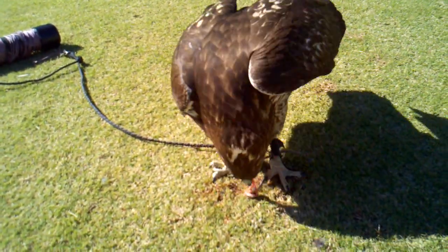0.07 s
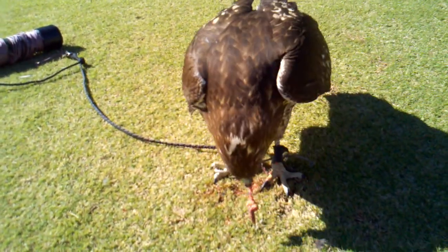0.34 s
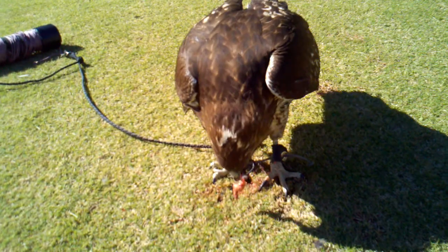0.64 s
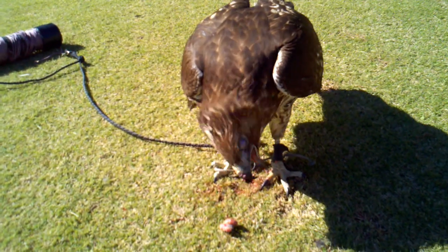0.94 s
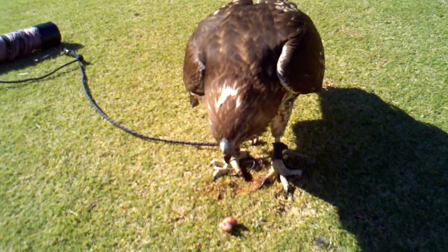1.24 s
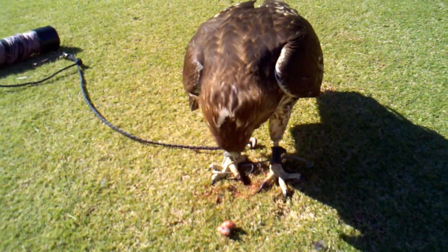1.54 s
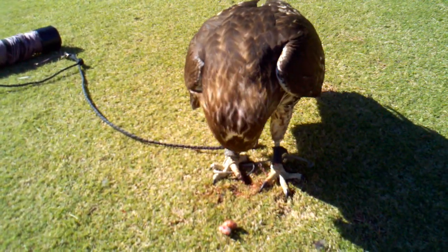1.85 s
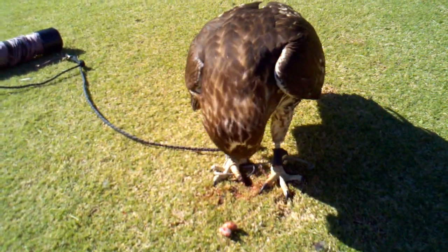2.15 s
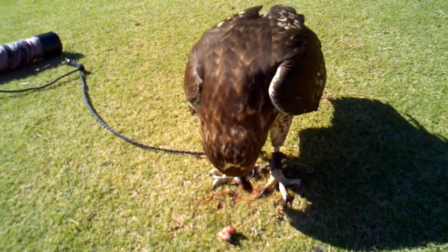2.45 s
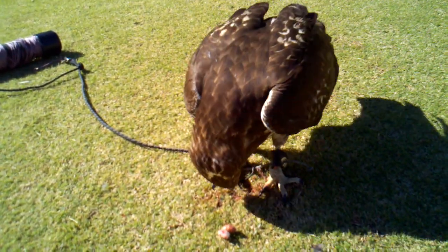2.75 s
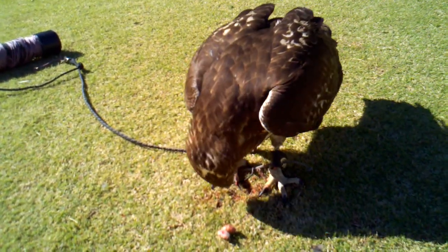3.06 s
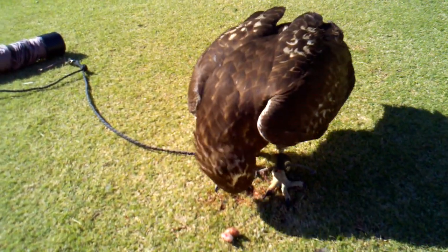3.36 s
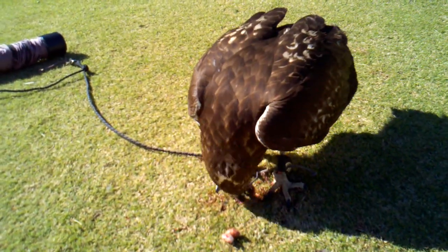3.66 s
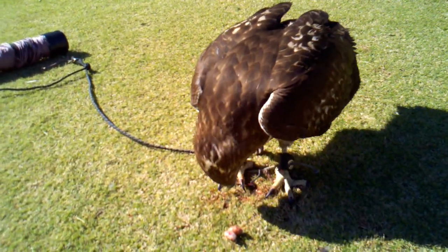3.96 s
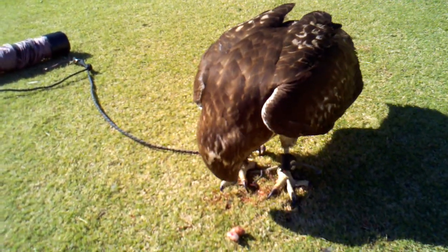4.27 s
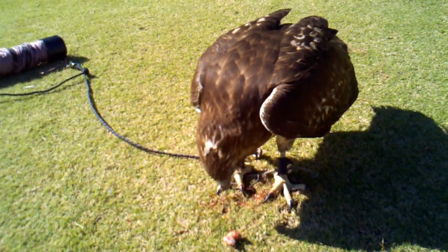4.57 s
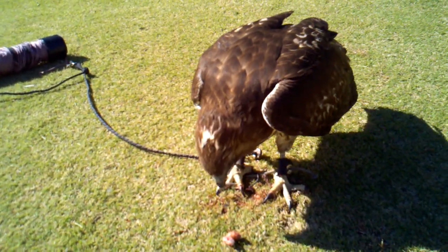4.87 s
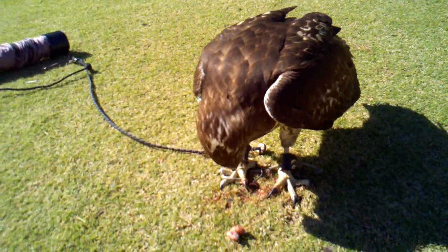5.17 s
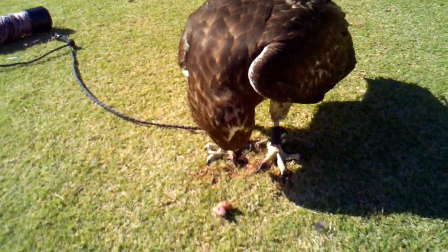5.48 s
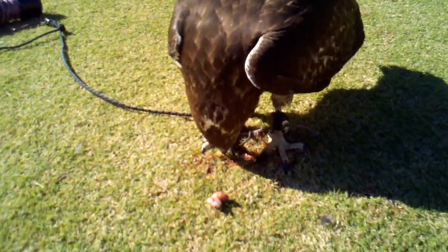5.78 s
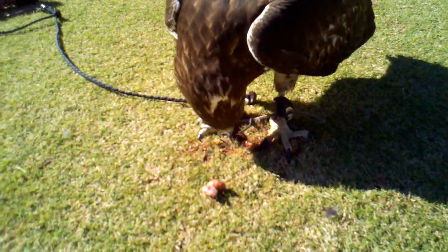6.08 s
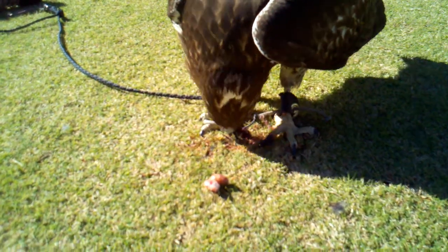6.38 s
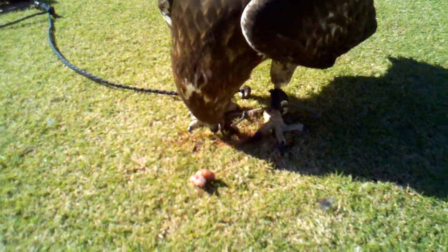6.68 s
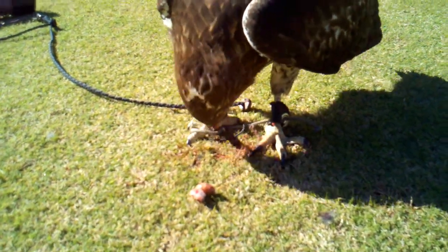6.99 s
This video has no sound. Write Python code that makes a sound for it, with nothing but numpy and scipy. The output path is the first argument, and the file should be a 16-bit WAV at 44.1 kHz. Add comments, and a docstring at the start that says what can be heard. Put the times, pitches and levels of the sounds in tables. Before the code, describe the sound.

Outdoors on a lawn, a distant engine like a mower drones throughout, over a low rumble and a fainter second motor hum. Just after 1 second its airy rush drops and its pitch rises slightly; the drone then slowly grows, wavering now and then. Light wind puffs on the microphone, mostly between 1 and 3 seconds and again from about 6.5. A hawk feeds close by, very faintly: soft beak snips near 0.9, 4 and 5.9 seconds, brief rustles and scattered tiny snaps of dry grass. From about 6.4 seconds a finger ticks and slides on the small camera's case. At about 6.8 it knocks the microphone with one sharp, overloaded pop, by far the loudest sound. The background ducks at once, and two short handling bumps follow around 7 seconds.

```python
"""A sunny lawn, heard through the two closely spaced ports of a small camera. Far away an engine,
perhaps a mower, drones and picks up speed, while light wind puffs at the ports. A tethered hawk
feeds with faint snips of the beak, rustles and snaps of dry grass; a second motor hums behind it.
Near the end a finger ticks and slides on the case, ringing the shell, and knocks one port, which
overloads and makes the gain control duck."""
import sys
import numpy as np
from scipy import signal
from scipy.fft import rfft, irfft, next_fast_len
from scipy.io import wavfile
from scipy.ndimage import uniform_filter1d

SR = 44100
rng = np.random.default_rng(int(sys.argv[2]) if len(sys.argv) > 2 else 0)


def wav_record(signal):
    """Record a signal, one row per channel, as 16-bit PCM in the file named by sys.argv[1]."""
    frames = np.transpose(np.atleast_2d(signal))
    bounded = np.clip(frames, -1, 1)
    # unit amplitude maps onto the largest positive 16-bit level
    quanta = np.round(bounded * 32767).astype(np.int16)
    wavfile.write(sys.argv[1], SR, quanta)


N = 314433

# How alike outdoor sound is at the two ports. Each row: frequency in Hz, correlation from -1 to 1.
LIKENESS = [(200, 1), (500, 0.66), (1000, -0.087), (1700, -0.51), (2500, 0.49), (4000, -0.14)]


def from_db(db):
    """Decibels to gain."""
    return 10 ** (np.asarray(db) / 20)


def rms_one(x):
    """Scale to rms 1."""
    return x / np.sqrt(np.mean(x ** 2) + 1e-20)


def seconds():
    """Time of every sample."""
    return np.arange(N) / SR


def crossing(middle_s, length_s):
    """A smooth step from 0 to 1."""
    return .5 + .5 * np.tanh((seconds() - middle_s) / length_s)


def swell(middle_s, half_length_s):
    """A bell curve of height 1 around a moment."""
    return np.exp(-np.minimum(((seconds() - middle_s) / half_length_s) ** 2, 50))


def drift(rate_hz):
    """A smooth random wobble of about rms 1, drawn every 100 samples."""
    r = np.exp(-200 * np.pi * rate_hz / SR)
    slow = signal.lfilter([1], [1, -2 * r, r * r], rng.standard_normal(N // 100 + 2002))[2000:]
    return np.interp(np.arange(N) / 100, np.arange(len(slow)), rms_one(slow))


def at_bins(points):
    """A curve over log frequency, read at every FFT bin."""
    hz, value = np.transpose(points)
    return np.interp(np.log(np.fft.rfftfreq(next_fast_len(N), 1 / SR) + 1), np.log(hz), value)


def noise(colour, likeness):
    """Noise at the two ports, from rows of (Hz, density in dB) and their correlation."""
    size = next_fast_len(N)
    common, apart = rfft(rng.standard_normal((2, size)))
    ports = np.sqrt(1 + likeness) * common + np.sqrt(1 - likeness) * apart * [[1], [-1]]
    return irfft(ports * from_db(at_bins(colour)), size)[:, :N] * np.sqrt(SR) / 2


def grains(per_s, spread_db):
    """Random clicks of uneven size, at rms 1."""
    sizes = from_db(spread_db * np.minimum(rng.exponential(1, N), 4)) * rng.choice([-1, 1], N)
    return rms_one(sizes * (rng.random(N) < per_s / SR))


def ring(force, hz, t60):
    """One mode: a unit click sets off a decaying sine of height 1."""
    r, w = from_db(-60 / (t60 * SR)), 2 * np.pi * hz / SR
    return signal.lfilter([0, np.sin(w)], [1, -2 * r * np.cos(w), r * r], force + 1e-18)


def tone(cycles, db, skew):
    """A sine at an rms level, its phase skew radians apart at the two ports."""
    return np.sqrt(2) * from_db(db) * np.sin(2 * np.pi * cycles + skew * np.array([[-.5], [.5]]))


def crank_hz(idle_hz=202.4, working_hz=211.2, pickup_s=1.2, settle_s=0.88):
    """Crank rate as the engine settles from idle to working speed; the pitches are its sixth order's."""
    still_idle = np.exp(-np.maximum(seconds() - pickup_s, 0) / settle_s)
    return (working_hz + (idle_hz - working_hz) * still_idle) / 6


def engine(drone_db=-48, rise_db_per_s=0.77, waver_db=0.5, fade_db=2.5, wander=0.75):
    """Crank orders droning, led by the sixth; moving air fades them and shifts their stereo phase."""
    # Brief dips of the sixth order. Each row: centre in seconds, depth in dB, half length in seconds.
    dips = [(1.4, 9, 0.18), (2.196, 9.5, 0.24), (6.226, 4, 0.15), (7.05, 14.5, 0.35)]
    # Weaker orders, arriving by many paths. Each row: multiple of the crank rate, early and late
    # level in dB, early and late phase between the ports in radians.
    orders = [(4, -59, -54, 0.17, 1.4), (5, -109, -71, .6, 0.73), (7, -62.5, -58, 0.16, 0.28),
              (8, -57.5, -73.5, 0.1, 3.7), (10, -73.5, -68.5, 0.19, .7), (12, -72, -77.5, 0.3, 0.39),
              (16, -81, -75.5, 0.59, 0.6)]
    dip_db = sum(depth_db * swell(s, half_length) for s, depth_db, half_length in dips)
    lead_db = drone_db + rise_db_per_s * seconds() - dip_db + waver_db * drift(6)
    partials = [(6, lead_db, 0.45)]   # order, level, phase between the ports
    dulling = crossing(middle_s=4.1, length_s=0.56)   # from a brighter balance to a deeper one
    for order, early_db, late_db, early_skew, late_skew in orders:
        db = early_db + (late_db - early_db) * dulling + fade_db * drift(0.25)
        partials.append((order, db, early_skew + (late_skew - early_skew) * dulling))
    turns = np.cumsum(crank_hz()) / SR
    return sum(tone(order * turns, db, skew * (1 + wander * drift(0.63))) for order, db, skew in partials)


def rush_gain_db(start_db=3, drop_db=5, ebb_db_per_s=1.5):
    """Fader for the machine's rush and whine: a quick drop and a slow ebb."""
    return start_db - drop_db * crossing(middle_s=1.26, length_s=0.13) - ebb_db_per_s * seconds()


def rush(flutter_db=2.0):
    """The far machine's broad, fluttering rush."""
    # Each row: frequency in Hz, density in dB ahead of the fader.
    colour = [(150, -79.5), (300, -83), (500, -93), (750, -94.5), (950, -99), (1020, -90), (1130, -93),
              (1350, -100), (1620, -90.5), (2000, -92), (2400, -103), (3500, -114), (6000, -130)]
    return from_db(rush_gain_db() + flutter_db * drift(17)) * noise(colour, at_bins(LIKENESS))


def whine(trim_db=-69.5, centre_hz=1040, spread_hz=120, fade_db=7.5):
    """High engine orders ride on the rush, each fading by itself, and give it a faint pitch."""
    hz = crank_hz()
    turns, out = np.cumsum(hz) / SR, 0
    for order in range(14, 50):
        off_centre = (order * hz.mean() - centre_hz) / spread_hz
        gain = from_db(fade_db * drift(0.85)) / np.hypot(1, off_centre)
        out = out + gain * np.sin(2 * np.pi * order * turns + 2 * drift(1))
    return from_db(rush_gain_db() + trim_db) * rms_one(out)


def wind(trim_db=-3.5, breeze_db=-55.5, rise_db_per_s=0.3, swing_db=3, wake_db=-11.5, wake_stretch=2.8):
    """Each puff, a wind eddy or air pushed by the hand, is a low swell in a longer, weaker wake, over a lumpy
    breeze; each port feels its own."""
    # The strongest puffs. Each row: centre in seconds, gain in dB, length in seconds.
    puffs = [(0.48, -45, 0.029), (0.62, -44.5, 0.026), (0.837, -44, 0.17), (1.096, -41, 0.053),
             (1.413, -41, 0.02), (1.634, -34, 0.012), (1.765, -34, 0.018), (1.85, -38, 0.082),
             (2.252, -28, 0.011), (2.476, -38.5, 0.065), (3.047, -37.5, 0.039), (4.368, -45, 0.03),
             (5.11, -46, 0.05), (5.387, -42, 0.057), (5.965, -37.5, 0.018), (6.362, -38.5, 0.011),
             (6.577, -30, 0.095), (6.809, -24, 0.019), (6.899, -22, 0.023)]
    # Their bassy colour. Each row: frequency in Hz, relative density in dB.
    colour = [(45, -49), (85, -23), (140, -21), (220, -28), (320, -32.5), (500, -52), (900, -59),
              (2000, -81)]
    power = from_db(breeze_db + rise_db_per_s * seconds() + swing_db * drift(2.3)) ** 2
    for s, db, length in puffs:
        puff = swell(s, length / np.sqrt(np.e))
        wake = from_db(wake_db) ** 2 * swell(s, length * wake_stretch)
        power += from_db(db) ** 2 * (puff + wake)
    return from_db(trim_db) * np.sqrt(power) * noise(colour, likeness=0)


def knock(start_s=6.7685, pulse_db=8.5, pulse_s=0.000601, leak_hz=85, right_db=-13):
    """The finger pops the left port: a crack and a pressure pulse that swings back as air leaks out."""
    # The port's crack. Each row: frequency in Hz, level in dB, time to fall 60 dB in seconds.
    modes = [(3850, 8.5, 0.002), (5150, 1, 0.0049), (12670, -2, 0.0019)]
    pulse = -from_db(pulse_db) * np.sin(np.pi * np.clip((seconds() - start_s) / pulse_s, 0, 1))
    swing = signal.sosfilt(signal.butter(4, leak_hz, "high", fs=SR, output="sos"), pulse + 1e-18)
    click = np.zeros(N)
    click[round(start_s * SR)] = -1
    crack = sum(from_db(db) * ring(click, hz, t60) for hz, db, t60 in modes)
    return np.array([swing + crack, from_db(right_db) * crack])


def case(force, low_cut_hz=1050, ring_share=1, shift_hz=0):
    """The small shell rings with little bass; a resting finger cuts the ring to a share of its length."""
    # Each row: frequency in Hz, gain in dB, time to fall 60 dB in seconds.
    modes = [(417, -6, 0.024), (1170, -25, 0.0033), (1495, -7.5, 0.016), (2100, -7.5, 0.0045),
             (2940, -13.5, 0.015), (3200, -18, 0.016), (11800, -20.5, 0.0034)]
    ringing = sum(from_db(db) * ring(force, hz + shift_hz, t60 * ring_share) for hz, db, t60 in modes)
    return signal.sosfilt(signal.butter(2, low_cut_hz, "high", fs=SR, output="sos"), ringing)


def ticks(grit=0.61, slip_s=0.0004, thud_hz=800):
    """A finger catches by the right port: short contacts snap, long ones slip, and its soft pad thuds."""
    # Each row: start in seconds, force in dB, contact time in seconds, left port gain in dB,
    # thud gain in dB, brightness in Hz, shift of the case's modes at that spot in Hz.
    contacts = [(6.385, -22, 0.00039, -30, -12, 5000, 0), (6.406, -18.5, 0.0023, -22, 1, 3600, -3),
                (6.4756, -5.5, 0.0000034, -60, -27, 6300, -16), (6.893, -20, 0.0022, -15, 32, 480, 3),
                (7.0466, -12.5, 0.00066, -34, 31, 3300, 226)]
    out, age = np.zeros((2, N)), np.arange(SR // 20) / SR
    for s, db, length, left_db, thud_db, bright_hz, shift_hz in contacts:
        slip_share = length / (length + slip_s)
        touch = rng.standard_normal(len(age)) * age * np.exp(-age / length)
        touch *= grit * np.sqrt(slip_share) / np.linalg.norm(touch)
        touch[0] += (1 - slip_share) ** 2   # the snap ahead of the gritty slip
        softened = signal.lfilter(*signal.butter(2, bright_hz, fs=SR), touch)
        force, start = np.zeros(N), round(s * SR)
        force[start:start + len(age)] = from_db(db) * softened
        thud = signal.lfilter(*signal.butter(1, thud_hz, fs=SR), force + 1e-18)
        out += (case(force, shift_hz=shift_hz) + from_db(thud_db) * thud) * from_db([[left_db], [0]])
    return out


def stroke(start, length, attack_share=0.64, release_db_per_s=550):
    """Finger pressure builds, holds, and dies away when the finger lifts."""
    age = seconds() - start
    attack = np.clip(age / (attack_share * length), 0, 1)
    return attack * from_db(-release_db_per_s * np.clip(age - length, 0, .5))


def slide(trim_db=2.0, left_db=-16, skin_db=-32, smooth_db=-5, soft_hz=1000):
    """Soft skin sticks and slips over the case in tiny jerks and keeps its modes ringing."""
    # Each row: start in seconds, length in seconds, gain in dB.
    strokes = [(6.361, 0.08, -62), (6.463, 0.033, -45), (6.488, 0.11, -56.5), (6.619, 0.14, -40.5),
               (6.799, 0.014, -42.5), (6.813, 0.033, -46)]
    pressure = sum(from_db(db) * stroke(start, length) for start, length, db in strokes)
    friction = grains(per_s=1100, spread_db=1.0) + from_db(smooth_db) * rng.standard_normal((2, N))
    force = signal.lfilter(*signal.butter(1, soft_hz, fs=SR), friction)
    rub = rms_one(case(force, ring_share=0.56)) + from_db(skin_db) * friction
    return from_db(trim_db) * pressure * rub * from_db([[left_db], [0]])


def brush():
    """The hand shifts its grip: dry skin hisses faintly beside both ports."""
    # Each row: centre in seconds, gain in dB, half length in seconds.
    grips = [(6.253, -77, 1), (6.776, -68, 0.081)]
    # The airy hiss of skin. Each row: frequency in Hz, relative density in dB.
    colour = [(2000, -59), (5000, -39), (9000, -33.5), (14000, -38)]
    envelope = sum(from_db(db) * swell(s, half_length) for s, db, half_length in grips)
    return envelope * noise(colour, likeness=0)


def pecks():
    """The hawk's beak snips at the food in short, soft ticks."""
    # Each row: start in seconds, gain in dB, rise time in seconds.
    snips = [(0.904, -53.5, 0.0047), (0.933, -54, .004), (2.243, -62, .003), (3.483, -59, 0.004),
             (3.987, -55, 0.003), (5.873, -48, 0.0016)]
    # Their muted colour. Each row: frequency in Hz, relative density in dB.
    colour = [(200, -38), (450, -30), (900, -40), (1700, -34.5), (2400, -36), (3500, -53), (6000, -59),
              (12000, -63)]
    envelope = 0
    for s, db, rise in snips:
        age = np.clip((seconds() - s) / rise, 0, 50)
        envelope = envelope + from_db(db) * age * np.exp(1 - age)
    return envelope * noise(colour, likeness=0.53)


def rustle():
    """The hawk's feathers and feet brush the grass in soft swells."""
    # Each row: centre in seconds, gain in dB, half length in seconds.
    moves = [(0.142, -11.5, 0.098), (0.911, -11.5, 0.051), (3.726, -15, 0.077), (5.677, -28, 0.11),
             (7.085, -5.5, 0.22)]
    # Their midrange colour. Each row: frequency in Hz, relative density in dB.
    colour = [(150, -100), (500, -79), (1000, -79.5), (1800, -78.5), (3500, -101), (8000, -118)]
    envelope = sum(from_db(db) * swell(s, half_length) for s, db, half_length in moves)
    return envelope * noise(colour, at_bins(LIKENESS))


def grass(crackle_db=-85.5, low_hz=3100, high_hz=7000, t60_s=0.009):
    """Dry blades ring under the talons, each at its own pitch: clear snaps over a faint crackle."""
    # The crackle lifts as the feet shift. Each row: centre in seconds, boost in dB, half length in seconds.
    steps = [(5.05, 10, .05), (5.663, 10, 0.13)]
    # Single blades snap. Each row: start in seconds, level in dB, pitch in Hz.
    snaps = [(1.2, -59, 3300), (1.548, -58, 3700), (1.691, -69, 5800), (2.529, -64, 6150),
             (3.506, -65, 6300), (3.666, -56, 3580), (4.452, -57, 3100), (5.225, -60, 6050),
             (5.647, -57, 3150), (5.935, -63, 6140), (6.094, -58, 3620), (6.224, -60, 11000)]
    pitches = np.geomspace(low_hz, high_hz, 10)
    crackle = sum(ring(grains(per_s=25, spread_db=6.0), hz, t60_s) for hz in pitches)
    boost_db = sum(db * swell(s, half_length) for s, db, half_length in steps)
    out = from_db(crackle_db + boost_db) * rms_one(crackle)
    for s, db, hz in snaps:
        click = np.zeros(N)
        click[round(s * SR)] = from_db(db)
        out += ring(click, hz, t60_s)
    return out


def hum(motor_hz=92.7, fade_db=4.0):
    """A second, fainter motor holds a few low tones, each fading by itself in the moving air."""
    # Each row: multiple of the motor's rate, level in dB.
    orders = [(2, -68.5), (4, -76.5), (5, -78)]
    turns = motor_hz * seconds()
    return sum(tone(order * turns, db + fade_db * drift(0.6), skew=0.59) for order, db in orders)


def rumble(waver_db=0.8):
    """A nearly steady bed of outdoor rumble from all around."""
    # Each row: frequency in Hz, density in dB.
    colour = [(20, -100), (45, -105), (85, -80), (125, -70.5), (200, -78.5), (300, -85.5), (450, -91),
              (600, -92), (900, -99), (1800, -93.5), (2400, -99), (3500, -105.2), (5500, -120),
              (12000, -125)]
    return from_db(-waver_db * drift(8.6)) * noise(colour, at_bins(LIKENESS))


def capsule_hiss():
    """Each microphone capsule's own noise floor."""
    # Each row: frequency in Hz, density in dB.
    colour = [(45, -102), (90, -88), (150, -93.5), (300, -86.5), (700, -105), (2000, -112), (6000, -116),
              (13000, -117)]
    return noise(colour, likeness=0)


def scene():
    """Pressure at the two ports, with the capsules' own hiss."""
    machine = engine() + whine() + rush()
    outdoors = rumble() + wind() + hum()
    hawk = rustle() + pecks() + grass()
    handling = brush() + ticks() + slide() + knock()
    return machine + outdoors + hawk + handling + capsule_hiss()


def gain_control(x, threshold_db=-16, release_db_per_s=5, attack_s=0.004):
    """A loud peak pulls the gain down; it creeps back afterwards."""
    power = uniform_filter1d(np.mean(x ** 2, axis=0), size=256)
    over_db = np.maximum(10 * np.log10(np.abs(power) + 1e-12) - threshold_db, 0)
    release_db = release_db_per_s * seconds()
    held_db = np.maximum.accumulate(over_db + release_db) - release_db
    delayed_db = np.interp(seconds() - attack_s, seconds(), held_db)
    r = np.exp(-1 / (attack_s * SR))
    duck_db = signal.lfilter([1 - r], [1, -r], delayed_db)
    return x * from_db(-duck_db)


def record(dry, lag_samples=17, clip_level=0.85, cutoff_hz=14000):
    """Each port minus the delayed other widens the stereo; then hiss, overload, ducking and high cut."""
    # Amplifier hiss. Each row: frequency in Hz, density in dB.
    preamp_colour = [(40, -105), (300, -118), (1000, -125), (2700, -122), (4500, -112), (7000, -110.5),
                     (13000, -112)]
    other_port = np.pad(dry[::-1], ((0, 0), (lag_samples, 0)))[:, :N]
    wide = dry - other_port + noise(preamp_colour, likeness=0)
    ducked = gain_control(np.clip(wide, -clip_level, clip_level))
    return signal.sosfilt(signal.ellip(10, .1, 80, cutoff_hz, fs=SR, output="sos"), ducked)


dry = scene()
out = record(dry)
wav_record(out)
```